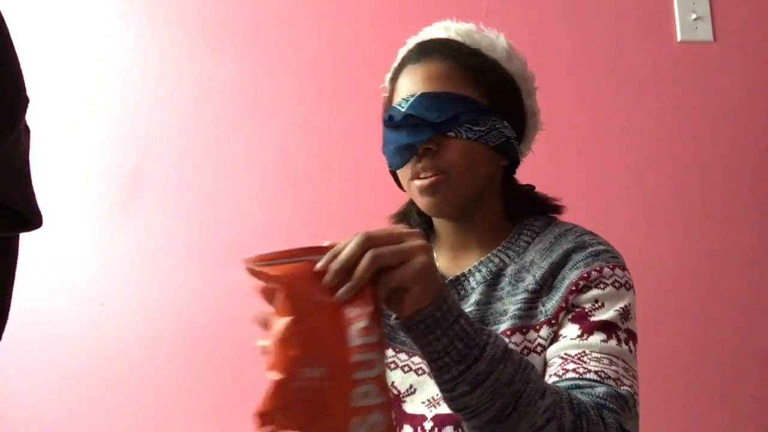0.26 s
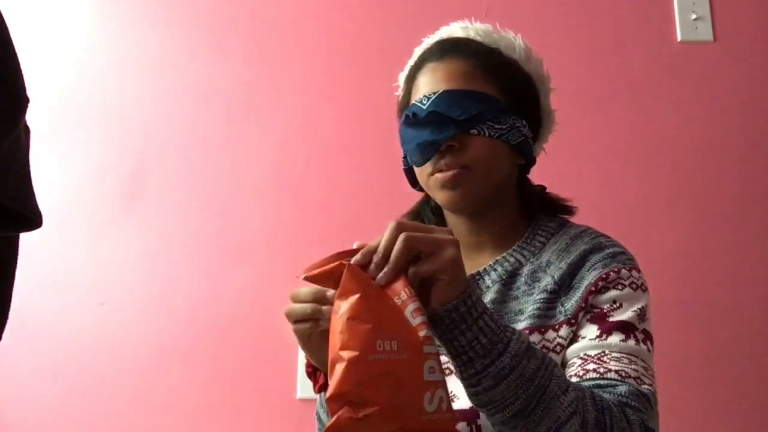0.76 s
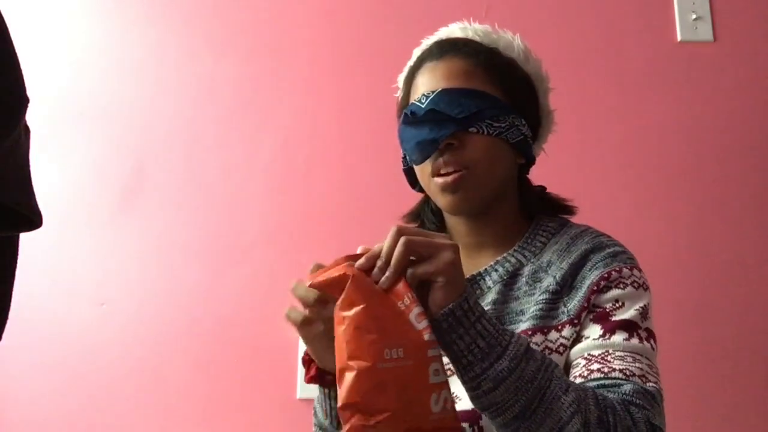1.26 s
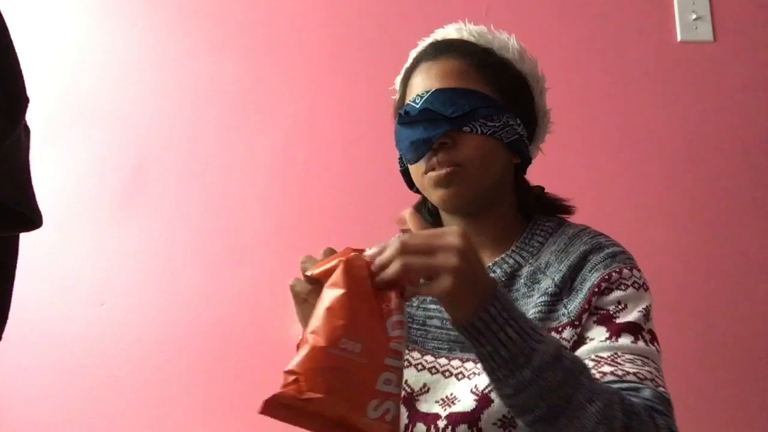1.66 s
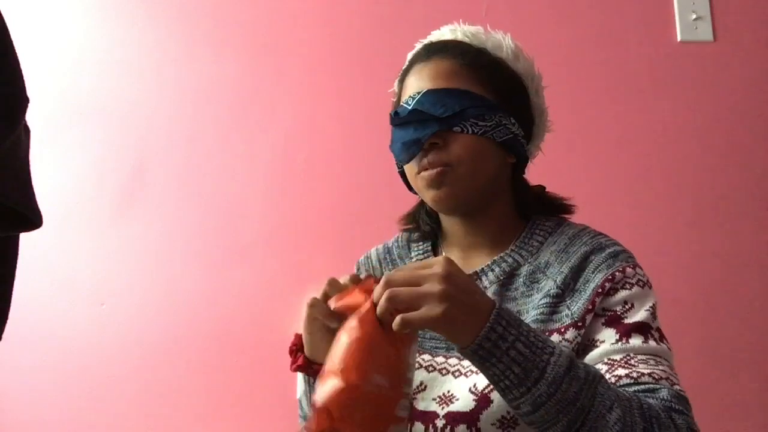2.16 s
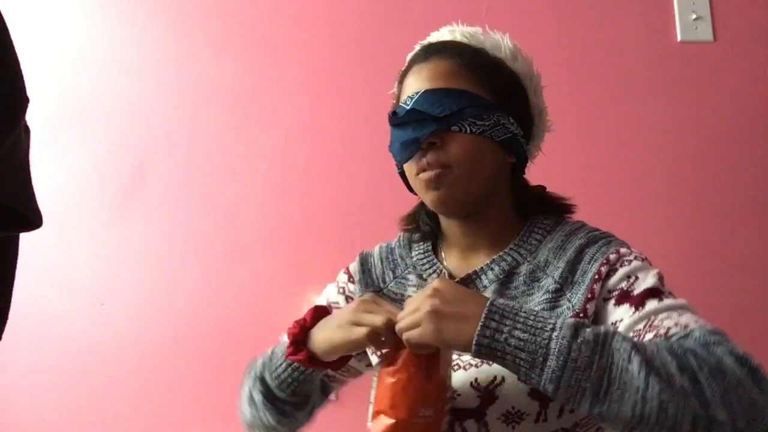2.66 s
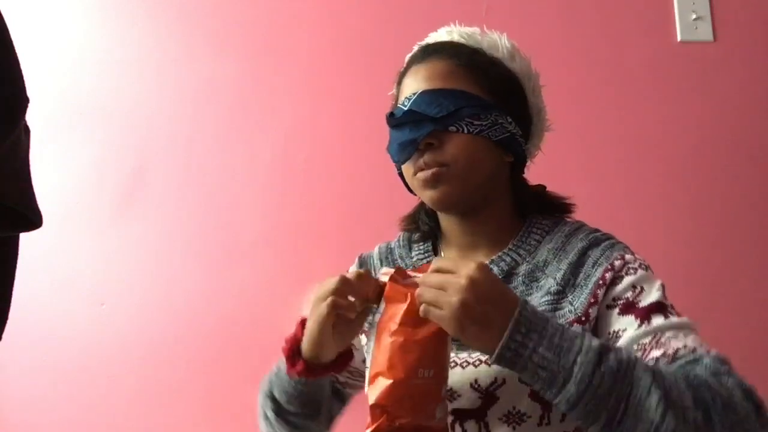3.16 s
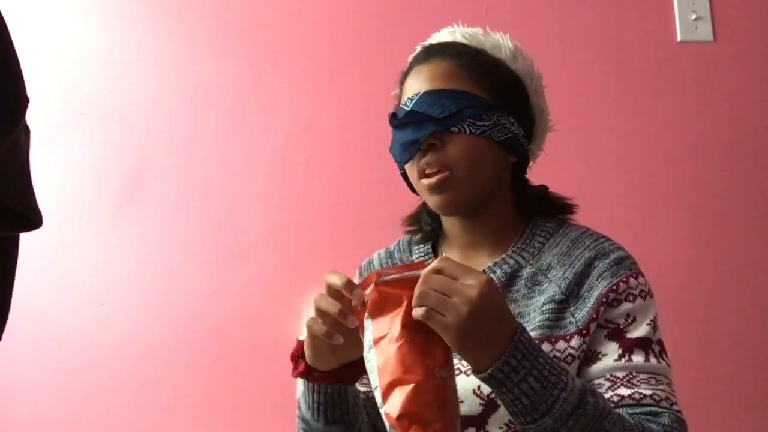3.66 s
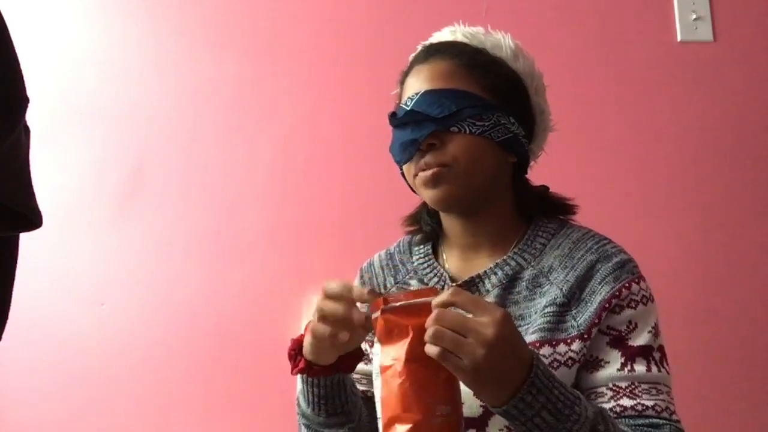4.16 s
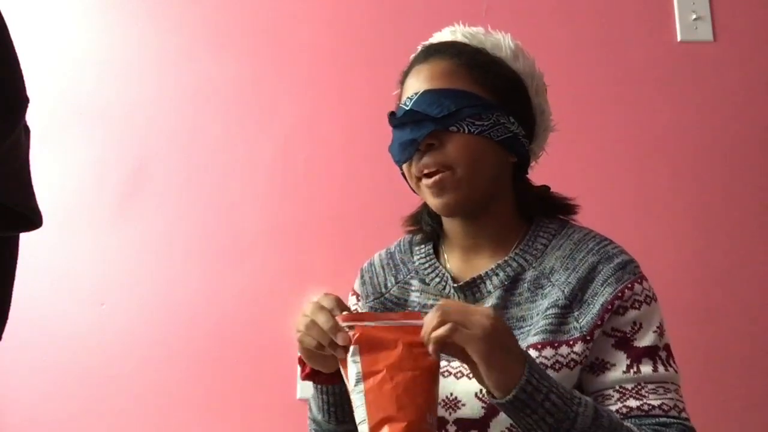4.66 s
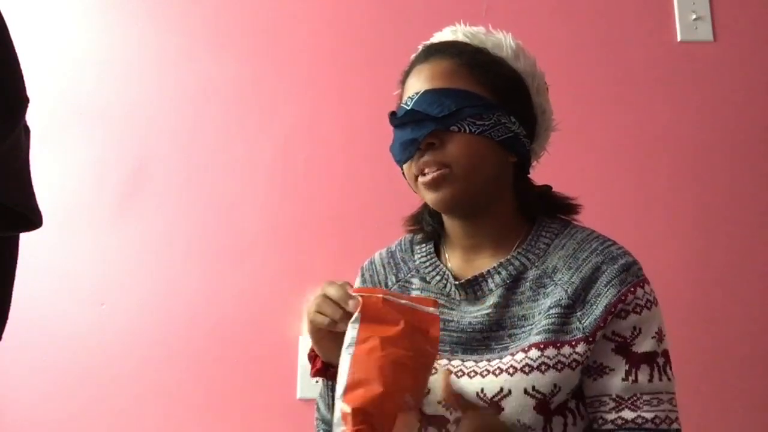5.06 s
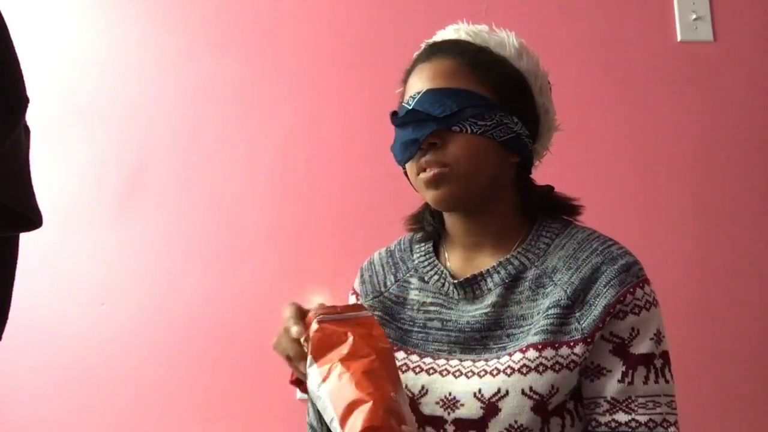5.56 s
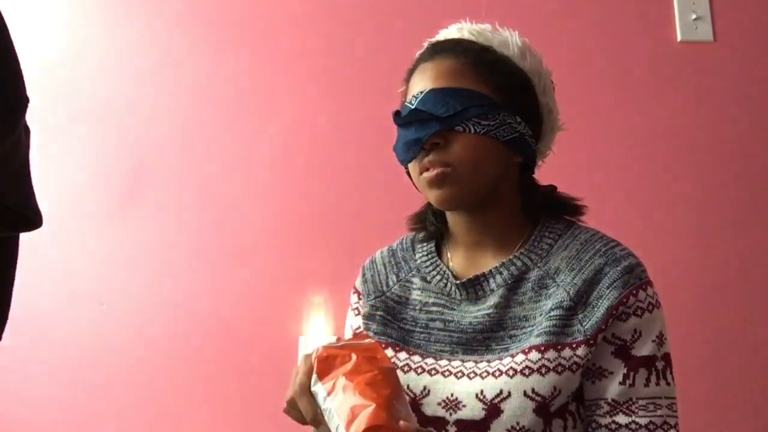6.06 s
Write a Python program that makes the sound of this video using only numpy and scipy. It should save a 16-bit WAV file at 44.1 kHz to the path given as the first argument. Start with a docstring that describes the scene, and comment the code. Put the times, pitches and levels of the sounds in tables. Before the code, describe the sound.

A foil snack bag is handled close to a small microphone in a furnished room with short, soft echoes. From 0 to 1 s, quick bright crinkles and snaps come with hollow pops of the bag walls, peaking near 0.8 s with soft low thumps. It thins to faint crackle from 1.1 to 1.4 s, then a loud snap and pop with a thump strike at 1.45 s. Moderate rustling follows, growing denser from 2 s; a very sharp, dry click cuts through at 2.6 s, and strong snaps cluster from 2.9 to 3.55 s. After 3.7 s it calms to fine crackle, with a ringing crunch at 4.1 s, a bright snap at 4.6 s and a few more until 5.2 s. Light crinkles, small pops and brief rests carry on to the end, about 6.3 s. A quiet low rumble and faint hum stay steady throughout.

```python
"""A furnished room, close to a small microphone: a foil snack bag is handled.
Buckling creases snap brightly: short noise bursts ring the resonances of foil facets and larger panels.
Flexing walls pop dully through the modes of the air inside; the shifting bag gives soft, low sine thumps.
Fine random crackle fills the gaps, in surges and rests. Echoes follow all but the thumps,
over a steady low rumble of shaped noise and a faint hum."""
import sys
import numpy as np
from scipy import signal
from scipy.fft import rfft, irfft
from scipy.io import wavfile
from scipy.ndimage import uniform_filter1d

SR = 44100
rng = np.random.default_rng(int(sys.argv[2]) if len(sys.argv) > 2 else 0)


def persist_wave(psi):
    """Save psi, clipped to +-1, as 16-bit WAV."""
    counts = np.round(np.clip(psi, -1, 1) * 32767).astype(np.int16)
    wavfile.write(sys.argv[1], SR, np.atleast_2d(counts).T)


N = 278296

# Resonances of the small foil facets. Each row: centre in Hz, width in Hz, relative level in dB.
CREASE_MODES = [(4040, 1380, -6), (5080, 1645, 5), (5870, 900, 6), (6790, 500, 0.5)]
# Top-octave resonances of the foil. Each row: centre in Hz, width in Hz, relative level in dB.
TOP_MODES = [(8670, 1180, -0.4), (9850, 2700, -2), (12130, 1130, 1.5), (15340, 1000, -11)]
# Resonances of the larger panels. Each row: centre in Hz, width in Hz, relative level in dB.
PANEL_MODES = [(1656, 200, 4), (2050, 52, 7), (2380, 630, 3.5), (3340, 880, 0), (3380, 94, -1)]
# Lower modes of the air in the bag. Each row: centre in Hz, width in Hz, relative level in dB.
AIR_LOW_MODES = [(380, 310, -12), (543, 22, -4), (665, 46, -2.5)]
# Upper modes of the air in the bag. Each row: centre in Hz, width in Hz, relative level in dB.
AIR_HIGH_MODES = [(994, 240, -5), (1253, 166, 13), (1310, 470, 2)]


def from_db(db):
    """Decibels to gain."""
    return 10 ** (np.asarray(db) / 20)


def rms_one(x):
    """Scale to rms 1."""
    return x / np.sqrt(np.mean(x ** 2) + 1e-20)


def resonate(x, modes):
    """Parallel resonances, alternating in sign, that pass white noise at rms 1; x may hold a row per mode."""
    impulse = np.eye(1, 4096)[0]
    out, answer = 0, 0
    x = np.broadcast_to(x, (len(modes), N))
    for k, (hz, width_hz, level_db) in enumerate(modes):
        r = np.exp(-np.pi * width_hz / SR)
        gain = (-1) ** k * from_db(level_db) * (1 - r * r) / 2
        b = gain * np.array([1, 0, -1])
        a = [1, -2 * r * np.cos(2 * np.pi * hz / SR), r * r]
        out = out + signal.lfilter(b, a, x[k])
        answer = answer + signal.lfilter(b, a, impulse)
    return out / np.sqrt(np.sum(answer ** 2))


def grains(per_s, spread_db, t60_s, modes, colour_db):
    """Random bursts of dying noise, mostly weak, a few strong; a row per mode, each reached differently; rms 1."""
    strengths = from_db(spread_db * np.minimum(rng.exponential(1, N), 3))
    marks = strengths * (rng.random(N) < per_s / SR)
    at = np.flatnonzero(marks)
    colours = from_db(colour_db * rng.standard_normal((len(at), len(modes))))
    rows = np.zeros((len(modes), N))
    rows[:, at] = marks[at] * colours.T
    envelope = signal.lfilter([1], [1, -from_db(-60 / (t60_s * SR))], rows + 1e-12)
    return rms_one(envelope * rng.standard_normal(N))


def rattles(t60_s, crack):
    """A crack, then dying noise, evened to excite all pitches alike; one row per decay time, energy 1."""
    decay = from_db(-60 * np.arange(1024) / SR / t60_s[:, None]) + 1e-9
    decay[:, 0] = crack
    rows = rng.standard_normal(decay.shape) * decay
    for _ in range(3):
        spectrum = rfft(rows)
        rows = irfft(spectrum / np.abs(spectrum))
        # put the decay back on the evened noise
        local_rms = np.sqrt(np.abs(uniform_filter1d(rows ** 2, size=9)) + 1e-14)
        rows *= decay / local_rms
    spectrum = rfft(rows)
    return irfft(spectrum / np.abs(spectrum))


def strike(times_s, levels_db, blows, modes, shift, colour_db):
    """Each blow meets the modes shifted in pitch and reaches every one with a different strength."""
    size = 4096
    late = np.exp(-2j * np.pi * np.fft.rfftfreq(size))   # one sample of delay
    strengths = from_db(colour_db * rng.standard_normal((len(times_s), len(modes))))
    answer = 0
    for k, (hz, width_hz, level_db) in enumerate(modes):
        r = np.exp(-np.pi * width_hz / SR)
        w = 2 * np.pi * np.clip(hz * shift, 50, .45 * SR)[:, None] / SR
        poles = 1 - 2 * r * np.cos(w) * late + (r * late) ** 2
        peak = (1 - r * r) / 2 * (1 - late ** 2) / poles
        answer = answer + (-1) ** k * from_db(level_db) * strengths[:, k:k + 1] * peak
    answer = answer / np.sqrt(np.mean(np.abs(answer) ** 2, axis=1, keepdims=True))
    rings = irfft(answer * rfft(blows, size), size)
    out = np.zeros(N + size)
    for s, level_db, ring in zip(times_s, levels_db, rings):
        out[round(s * SR):][:size] += from_db(level_db) * ring
    return out[:N]


def drift(per_s):
    """Slow random wander, rms 1, from noise through a double one-pole low-pass at per_s Hz."""
    r = np.exp(-2 * np.pi * per_s / SR)
    slow = signal.lfilter([1], [1, -2 * r, r * r], rng.standard_normal(N + SR))[SR:]
    return rms_one(slow)


def busyness():
    """Rests and irregular surges of the fingers, in dB."""
    # Moments when the fingers rest. Each row: start in seconds, length in seconds, drop in dB.
    finger_rests = [(0.0, 0.052, 3.5), (0.495, 0.049, 5), (1.398, 0.035, 12), (1.751, 0.11, 14.5),
                    (1.952, 0.06, 13), (2.542, 0.031, 19), (2.897, 0.027, 4), (3.399, 0.061, 11),
                    (4.132, 0.094, 4.5), (4.85, 0.15, 16), (5.126, 0.071, 12), (6.102, 0.074, 7.5)]
    surge_rms_db, surges_per_s, rest_fade_s = 2, 6, 0.0016
    t = np.arange(N) / SR
    change_db = surge_rms_db * drift(surges_per_s)
    for s, length_s, drop_db in finger_rests:
        fade = np.clip((t - s) / rest_fade_s, 0, 1)
        change_db = change_db - drop_db * fade * (t < s + length_s)   # resumes at once
    return change_db


def crackle():
    """Many tiny creases give way at random while fingers slide; returns the foil's share and the air's."""
    # How busily the fingers work the bag, before the trims below.
    # Each row: time in seconds, foil level in dB, larger panel level in dB, inside air level in dB.
    handling_levels = [(0.0, -42.5, -46.5, -52.5), (0.12, -51.5, -58, -51), (0.3, -47, -52.5, -53.5),
                       (0.65, -49.5, -53, -51.5), (0.72, -54, -61.5, -60), (0.82, -46, -50, -45.5),
                       (1.09, -52.5, -57, -56.5), (1.3, -56.5, -61, -60), (1.54, -53.5, -54.5, -52.5),
                       (1.92, -52.5, -58, -55.5), (2.15, -45.5, -48, -44), (2.41, -55, -52.5, -56.5),
                       (2.55, -47, -51, -51), (2.78, -53, -56.5, -62), (3.0, -50, -45, -80),
                       (3.16, -41, -56, -43.5), (3.34, -49, -54, -54), (3.56, -50.5, -59, -55),
                       (3.87, -55.5, -59.5, -60.5), (4.02, -50, -57, -53.5), (4.37, -60, -63.5, -61),
                       (4.7, -52.5, -53, -52), (5.04, -54.5, -56, -56), (5.38, -51.5, -56, -57),
                       (5.5, -56, -59.5, -59), (5.62, -48.5, -52, -47.5), (5.76, -55.5, -54.5, -61.5),
                       (5.97, -49.5, -53.5, -53), (6.12, -54, -55.5, -56), (6.31, -52.5, -59, -60)]
    s, *levels_db = np.transpose(handling_levels)
    t = np.arange(N) / SR
    change_db = busyness()
    foil_db, panel_db, air_db = (np.interp(t, s, level_db) + change_db for level_db in levels_db)

    foil_modes = CREASE_MODES + TOP_MODES + PANEL_MODES
    ticks = grains(600, spread_db=5.5, t60_s=.001, modes=foil_modes, colour_db=2.5)
    ticks = ticks + from_db(-2.5) * rng.standard_normal(N)   # sliding skin rustles evenly
    crease, top, panel = np.split(ticks, np.cumsum([len(CREASE_MODES), len(TOP_MODES)]))
    bright = resonate(crease, CREASE_MODES) + from_db(2.5) * resonate(top, TOP_MODES)
    foil = from_db(foil_db - 9.5) * bright + from_db(panel_db - 8.0) * resonate(panel, PANEL_MODES)

    air_modes = AIR_HIGH_MODES + AIR_LOW_MODES
    flexes = grains(350, spread_db=2.5, t60_s=.004, modes=air_modes, colour_db=3.5)
    high, low = np.split(flexes, [len(AIR_HIGH_MODES)])
    air = resonate(high, AIR_HIGH_MODES) + from_db(-2.0) * resonate(low, AIR_LOW_MODES)
    return foil, from_db(air_db - 2.0) * air


def rumble():
    """Low room rumble: steady noise given a spectrum that falls off above the bass."""
    # Rumble spectrum. Each row: frequency in Hz, relative density in dB per Hz.
    rumble_spectrum = [(18, -79), (30, -13), (118, -0.5), (172, -5), (211, -1), (258, -10), (320, -5.5),
                       (450, -17), (580, -63), (990, -120)]
    level_db = -56.5
    points = np.array(rumble_spectrum)
    hz = np.fft.rfftfreq(N, 1 / SR) + 1   # keeps the log finite
    shape = from_db(np.interp(np.log(hz), np.log(points[:, 0]), points[:, 1]))
    return from_db(level_db) * rms_one(irfft(shape * rfft(rng.standard_normal(N)), N))


def hum():
    """A distant motor: noise through one narrow resonance."""
    hz, width_hz, level_db = 126.5, 5.4, -60
    return from_db(level_db) * resonate(rng.standard_normal(N), [(hz, width_hz, 0)])


def room(x):
    """Early echoes, then dense ones that die band by band; the bag moves, so their fine pattern keeps changing."""
    # Dense echoes. Each row: frequency in Hz, 60 dB decay time in seconds, relative level in dB.
    band_decays = [(144, 0.17, 9), (620, 0.15, 3), (1153, 0.14, 2), (2900, 0.14, 9), (5960, 0.14, 6),
                   (13800, 0.14, 7)]
    # First echoes, from the chest behind the bag and then the near walls. Each row: delay in ms, level in dB.
    first_echoes = [(1.7, -15), (10.0, -16), (11.5, -17), (14.2, -18), (16.8, -19), (21.8, -19)]
    tail_db, wall_delay_s, wall_rise_s = 2.5, .0092, .003
    near_share, near_t60_s = 1.02, 0.051   # hands and bag scatter sound before the walls answer
    length, step = SR // 3, 4096
    t, table = np.arange(length) / SR, np.array(band_decays)
    edges_hz = np.geomspace(100, 19000, 12)
    centres = np.log(edges_hz[:-1] * edges_hz[1:]) / 2
    t60_s, level_db = (np.interp(centres, np.log(table[:, 0]), table[:, k])[:, None] for k in (1, 2))
    walls = np.clip((t - wall_delay_s) / wall_rise_s, 0, 1)
    near = near_share * from_db(-60 * t / near_t60_s)
    shape = from_db(level_db - 60 * t / t60_s) * (walls + near)
    white = rng.standard_normal(N + length)
    bands = np.array([signal.sosfilt(signal.butter(2, edge, "band", fs=SR, output="sos"), white)
                      for edge in zip(edges_hz, edges_hz[1:])])
    out = np.zeros(N + SR)
    for at in range(0, N, step):
        tail = np.sum(shape * bands[:, at:at + length], axis=0)
        tail *= from_db(tail_db) / np.sqrt(np.sum(tail ** 2))
        for ms, echo_db in first_echoes:
            tail[round((ms + rng.normal(0, .15)) * SR / 1000)] += from_db(echo_db)
        wet = signal.fftconvolve(x[at:at + step], tail)
        out[at:at + len(wet)] += wet
    return out[:N]


def pops():
    """A flexing wall pushes the air in the bag, which rings in a lower and a higher group of modes."""
    # Stronger wall flexes, levels before the make-up gains below. Each row: start in seconds,
    # upper-mode level in dB, lower-mode level relative to it in dB, pitch in Hz.
    wall_flexes = [(0.069, -33, -26, 1160), (0.1122, -34.5, -16, 1190), (0.1944, -35.5, -11, 1150),
                   (0.2129, -32.5, -20, 1249), (0.265, -34, -12.5, 1240), (0.32, -46, -20, 1140),
                   (0.3602, -36, -12, 1400), (0.3903, -35, -20, 1180), (0.421, -31, -8.5, 1190),
                   (0.472, -39.5, -11, 1190), (0.577, -35.5, -9.5, 1200), (0.6524, -30.5, -13, 1190),
                   (0.7945, -26, -8, 1270), (0.831, -41.5, 6, 1230), (0.858, -40.5, -4, 1230),
                   (0.939, -32, -15, 1200), (0.9752, -32.5, -16, 1210), (1.0154, -33.5, -17, 1200),
                   (1.1318, -39.5, -7, 1100), (1.438, -38, -15, 1220), (1.446, -22, -15, 1140),
                   (1.471, -30.5, -36, 1222), (1.566, -33.5, -11, 1230), (1.6342, -30, -14, 1320),
                   (1.6933, -54, -19, 1268), (1.856, -37, -20, 1130), (1.93, -36, -6, 1210),
                   (2.034, -42, -21, 1210), (2.089, -34, -10, 1200), (2.149, -31, -14, 1140),
                   (2.1962, -28, -12, 1310), (2.2563, -30, -14, 1240), (2.336, -38.5, -5.5, 1290),
                   (2.5071, -35.5, -11, 1220), (2.5775, -38.5, -5, 1210), (2.6017, -36, -28, 1290),
                   (2.654, -34.5, -6, 1260), (2.768, -42, -23, 1300), (2.7848, -43.5, 1.5, 1250),
                   (2.825, -34.5, -11.5, 1260), (2.8812, -39.5, -2, 1260), (2.9307, -31, -7.5, 1160),
                   (2.9976, -36, -10, 1250), (3.0371, -34, -7.5, 1470), (3.1422, -39.0, -20, 1240),
                   (3.2146, -31, -12, 1375), (3.2597, -33, -21, 1197), (3.302, -31, -18, 1226),
                   (3.3369, -31, -19, 1230), (3.349, -33, -17, 1240), (3.5177, -33, -18, 1360),
                   (3.548, -30.5, -11, 1230), (3.6802, -36.5, -5, 1160), (3.749, -46.5, -28, 1250),
                   (3.7852, -41, -25, 1180), (3.8654, -33.5, -7, 1250), (3.8791, -37.5, 2, 1254),
                   (3.956, -44, -26, 1260), (4.0332, -35.5, -7, 1300), (4.0463, -36, -22, 1280),
                   (4.1085, -34.5, 5.5, 1350), (4.2699, -34, -8.5, 1280), (4.421, -29, -20, 1180),
                   (4.498, -41.5, -10, 1200), (4.605, -35.5, -28, 1230), (4.6201, -32, -10, 1250),
                   (4.69, -34.4, -10, 1300), (4.7266, -37, -22, 1300), (4.7361, -30, -12.5, 1210),
                   (4.812, -30.5, -23, 1160), (4.8564, -30.5, -28, 1250), (4.929, -34.5, -10.5, 1280),
                   (4.961, -30.5, -18.1, 1252), (5.01, -30, -21, 1240), (5.2294, -36, -14, 1220),
                   (5.4813, -39, -26, 1310), (5.549, -38.5, -2, 1350), (5.577, -39, -16, 1260),
                   (5.6436, -30.5, -15, 1280), (5.7842, -33.5, -23, 1260), (5.8428, -32.5, -20, 1205),
                   (5.9109, -29.5, -33, 1350), (6.035, -34, -29, 1280), (6.0563, -33, -11, 1270),
                   (6.0972, -35, -16, 1220), (6.3048, -34.5, -19, 1210)]
    unshifted_hz = 1240   # this pitch leaves the upper modes as listed
    s, level_db, low_db, hz = np.transpose(wall_flexes)
    blows = rattles(np.full(len(s), 0.012), crack=2.47)
    high = strike(s, level_db + 18.5, blows, AIR_HIGH_MODES, hz / unshifted_hz, colour_db=4.0)
    shift = 1 + 0.019 * rng.standard_normal(len(s))
    low = strike(s, level_db + low_db + 22, blows, AIR_LOW_MODES, shift, colour_db=2.0)
    # the pops carry little treble above about 2.2 kHz
    return signal.sosfilt(signal.butter(2, 2200, fs=SR, output="sos"), high + low)


def snaps():
    """A crease cracks and rattles for a few milliseconds, shaking small facets and larger panels at once."""
    # Louder creases buckling, levels as if spread over 5 ms. Each row: start in seconds, crease level in dB,
    # top octave level in dB, larger panel level in dB, rattle 60 dB decay in ms (held to 1-40 below).
    crease_buckles = [(0.0918, -42.5, -39, -43, 13), (0.1109, -42, -39, -45, 19),
                      (0.1943, -33, -30, -41, 3.8), (0.2236, -42, -34, -42.5, 11.5),
                      (0.2723, -42, -43, -46, 38), (0.36, -33.5, -30.5, -37, 13),
                      (0.3846, -43, -38, -42.5, 18), (0.4208, -33.5, -32.5, -39, 17),
                      (0.4726, -32, -31, -41.5, 4.3), (0.5752, -36.5, -32, -59, 4.6),
                      (0.5845, -56, -33.5, -48.5, 9.2), (0.6045, -40, -35.5, -47, 8),
                      (0.6508, -32, -27.5, -46, 0.88), (0.733, -49, -36.5, -54, 5),
                      (0.7647, -37, -30, -39.5, 10), (0.775, -42, -31, -58, 39),
                      (0.7855, -31, -24, -49, 4.7), (0.7952, -31.5, -29, -30, 11),
                      (0.8046, -37, -36, -54, 29), (0.8346, -39.3, -36, -50, 20.3),
                      (0.873, -37, -38, -46, 12.4), (0.88, -43, -30.5, -64, 6.4),
                      (0.8933, -38.5, -43, -43.5, 9.3), (0.93, -43, -45, -45, 11),
                      (0.9499, -48, -30.5, -55, 9), (0.9594, -39, -44, -41, 55),
                      (0.9911, -46, -44.1, -46, 12), (1.014, -35, -35.5, -40, 7.3),
                      (1.13, -49, -49, -56, 20), (1.185, -43, -45.5, -56, 4.4),
                      (1.251, -46.5, -43, -47, 28), (1.33, -69, -60, -70, 12),
                      (1.358, -45.5, -46.5, -57, 6.7), (1.367, -59, -62, -72, 14), (1.4, -58, -52, -67, 6),
                      (1.447, -29.5, -27.5, -38, 31), (1.566, -37.5, -34, -43, 5.1),
                      (1.5962, -45.8, -37.5, -49, 30), (1.6337, -38.5, -42, -41, 18),
                      (1.6928, -35, -30.5, -41.5, 11), (1.717, -64, -56, -50.5, 15),
                      (1.8565, -50.4, -49, -53, 9), (1.9109, -47, -49, -46.5, 28),
                      (1.933, -48, -46.5, -52, 6.3), (1.982, -52, -45, -55, 15),
                      (2.0338, -35.5, -37, -41.5, 8.7), (2.0885, -37, -30, -40.5, 16),
                      (2.0968, -39.5, -31, -45, 28), (2.184, -39.5, -42, -49, 12),
                      (2.191, -40, -39, -37, 26), (2.2264, -41, -50, -46, 21),
                      (2.2563, -34.5, -36, -45, 3.3), (2.2701, -39, -31, -46, 4.8),
                      (2.3187, -42, -38, -55, 5.2), (2.335, -39, -36, -45, 20),
                      (2.346, -47, -39, -59.3, 19), (2.356, -51, -40, -49, 14),
                      (2.3833, -33.5, -27, -54, 3.1), (2.415, -39, -34, -53, 17.4),
                      (2.426, -37.5, -30, -44.5, 32), (2.454, -38.5, -34, -45.5, 22),
                      (2.506, -41.5, -36.5, -48, 8.7), (2.536, -42, -58, -45.5, 5.5),
                      (2.5778, -22, -21.5, -45, 1.5), (2.6525, -40, -38, -42.3, 21),
                      (2.664, -47, -38.5, -39.5, 38), (2.6719, -39.5, -32.5, -62, 19),
                      (2.728, -42, -63, -41, 9.5), (2.7698, -40.5, -41.5, -63.5, 13),
                      (2.8257, -36.5, -36.5, -63, 4.5), (2.8477, -45, -38, -52, 7.4),
                      (2.8561, -36.5, -35, -50, 27), (2.9322, -34, -28, -43, 9),
                      (2.9417, -33.5, -29, -53, 5.2), (2.9624, -49.5, -31, -45, 22),
                      (2.996, -28, -25.5, -39.5, 8.8), (3.036, -27, -27.5, -41.5, 14),
                      (3.0425, -35, -35, -52, 6.4), (3.111, -49.5, -43, -56, 15),
                      (3.127, -49, -40, -47, 21), (3.1627, -41, -37, -38.5, 22),
                      (3.1779, -55.1, -41, -52, 14), (3.2139, -44, -51, -41, 6.5),
                      (3.225, -33, -28.5, -57, 6), (3.2597, -36.5, -35, -42.5, 18),
                      (3.3056, -30, -26.5, -42, 9.6), (3.3444, -39.5, -42, -47, 15),
                      (3.375, -50, -40, -66, 11), (3.422, -43.5, -44, -69, 5.5), (3.461, -48, -47, -54, 18),
                      (3.4958, -47, -33.5, -69.3, 5.1), (3.516, -47, -39, -61, 18),
                      (3.5246, -37, -35, -50, 18), (3.5401, -29.5, -30, -42, 17),
                      (3.566, -36.5, -42, -44, 9.2), (3.5893, -49.6, -40, -57, 12),
                      (3.641, -42, -41.5, -41.5, 14), (3.6812, -35, -33.5, -41.5, 11),
                      (3.6907, -58, -36.5, -60, 19), (3.751, -50, -47, -57, 8),
                      (3.7845, -50, -66.5, -57, 11), (3.8153, -46.5, -47, -51.5, 13),
                      (3.867, -58, -56, -61, 21), (3.8786, -50, -55, -45.5, 13),
                      (3.9775, -50, -46, -51.5, 29), (3.9868, -44, -45, -50.5, 25),
                      (4.013, -48, -42, -53, 13), (4.0329, -38, -32, -42.5, 8.2),
                      (4.044, -58, -39, -56, 24), (4.109, -31.5, -33.5, -30, 30),
                      (4.245, -52, -54, -53, 28), (4.269, -43, -41.5, -44, 11),
                      (4.4068, -45.5, -39.5, -49, 11), (4.42, -39, -36, -37, 20),
                      (4.4234, -36.5, -35, -61, 11), (4.5165, -48, -47.5, -57, 12),
                      (4.6054, -28.5, -28, -32, 12), (4.652, -35, -29.5, -41, 13),
                      (4.728, -42.5, -41, -48, 13), (4.7364, -37.5, -37.5, -45.5, 38),
                      (4.812, -34.5, -36.5, -41, 11), (4.8569, -40.5, -45, -46, 18),
                      (4.9306, -51, -56, -56, 5.5), (4.9603, -34.5, -30.5, -40, 4.9),
                      (5.0094, -35, -31.5, -47, 8.1), (5.082, -44.5, -39, -62, 16),
                      (5.09, -62, -46, -74, 31), (5.2214, -33.5, -32, -43, 6.1), (5.341, -56, -51, -64, 12),
                      (5.3527, -52, -49, -68, 12), (5.371, -47, -42.5, -51, 48), (5.455, -68, -52, -70, 17),
                      (5.481, -51, -47, -60, 36), (5.5186, -45, -43, -47.5, 44),
                      (5.5474, -45, -42, -48, 50), (5.578, -46, -45, -48, 25), (5.6168, -48, -53, -46, 16),
                      (5.641, -34, -33, -40.5, 24), (5.652, -40, -36, -48, 7.4), (5.674, -49, -45, -58, 16),
                      (5.7314, -46, -48, -67, 6.2), (5.7828, -49.5, -41, -60, 13),
                      (5.8436, -43.5, -44, -47.5, 17), (5.8562, -47, -42, -44, 25),
                      (5.8998, -44.5, -53, -47.5, 13), (6.0343, -45, -35.5, -63, 12),
                      (6.0534, -41.5, -40, -47.5, 15), (6.0975, -51, -65, -53.5, 7.9),
                      (6.2174, -50.5, -50, -56, 14), (6.3037, -43.5, -41.5, -40, 20)]
    level_span_s = .005
    size_spread = 0.054   # every crease has its own size, so its resonances shift by this share
    s, *levels_db, rattle_ms = np.transpose(crease_buckles)
    # level to energy
    crease_db, top_db, panel_db = np.array(levels_db) + 10 * np.log10(level_span_s * SR)
    blows = rattles(np.clip(rattle_ms, 1, 40) / 1000, crack=3.92)
    shift = 1 + size_spread * rng.standard_normal(len(s))
    crease = strike(s, crease_db, blows, CREASE_MODES, shift, colour_db=0.5)
    top = strike(s, top_db, blows, TOP_MODES, shift, colour_db=1.8)
    panel = strike(s, panel_db, blows, PANEL_MODES, np.sqrt(shift), colour_db=-0.5)
    return crease + top - panel


def thumps():
    """The full bag shifts in the hands: soft low knocks, a few sine cycles that swell and die."""
    # Shifts of the bag. Each row: start in seconds, level in dB before 11 dB of make-up, pitch in Hz.
    bag_shifts = [(0.124, -41.5, 207), (0.792, -40, 213), (0.833, -41, 225), (1.446, -36, 192),
                  (1.637, -45, 207), (1.716, -48, 393), (1.913, -46, 235), (2.343, -46.5, 190),
                  (3.018, -46, 136), (3.141, -46, 347), (3.36, -47.5, 180), (3.875, -47, 151),
                  (4.111, -42, 140), (4.269, -49.5, 320), (4.63, -46, 206), (5.043, -41.5, 190),
                  (5.593, -44, 176), (5.987, -47, 260)]
    rise_s, t60_s = 0.0013, 0.044
    out, t = np.zeros(N + 4096), np.arange(4096) / SR
    swell = (1 - np.exp(-t / rise_s)) * from_db(-60 * t / t60_s)
    for s, level_db, hz in bag_shifts:
        out[round(s * SR):][:4096] += from_db(level_db + 11.0) * swell * np.sin(2 * np.pi * hz * t)
    return out[:N]


def scene():
    """Bag, its echoes, and the steady background."""
    foil, air = crackle()
    foil = foil + snaps()
    air = air + pops()
    air_send_db = -2   # soft furnishings and clothes return less of the dull sounds
    echoes = room(foil + from_db(air_send_db) * air)
    return (foil + air + thumps() + echoes + rumble() + hum())[None]


def record(dry):
    """The small capsule drops the deepest bass; the top is cut steeply."""
    stop_hz = 16700   # 70 dB down from here up
    dry = signal.sosfilt(signal.butter(3, 45, "high", fs=SR, output="sos"), dry)
    return signal.sosfilt(signal.cheby2(14, 70, stop_hz, fs=SR, output="sos"), dry)


dry = scene()
out = record(dry)
persist_wave(out)
```